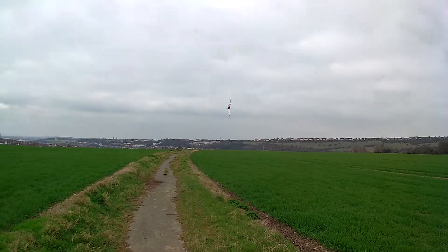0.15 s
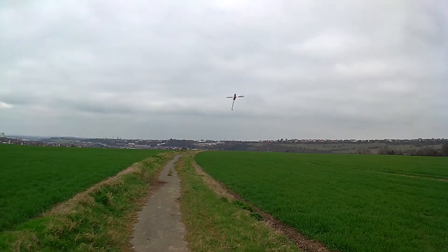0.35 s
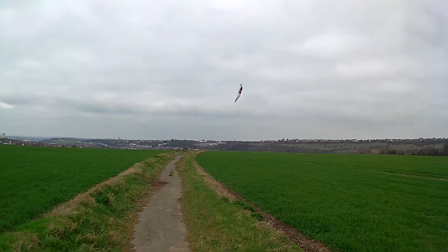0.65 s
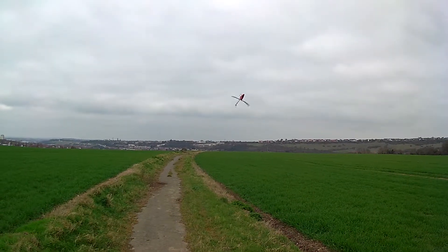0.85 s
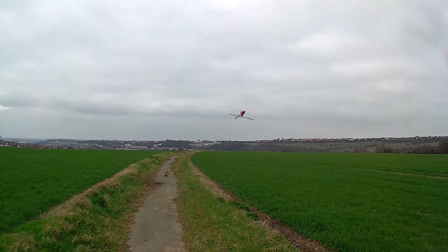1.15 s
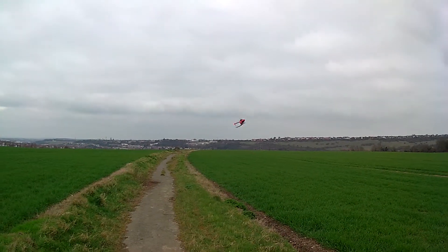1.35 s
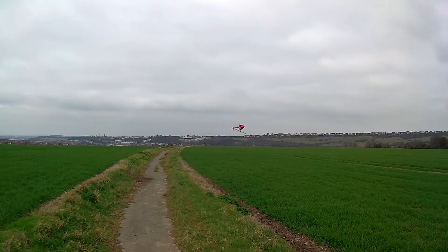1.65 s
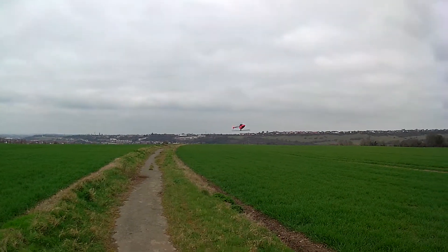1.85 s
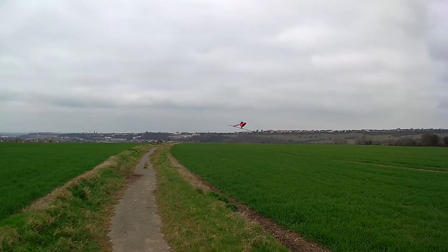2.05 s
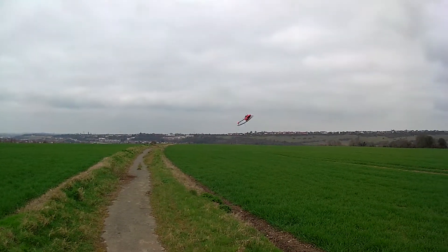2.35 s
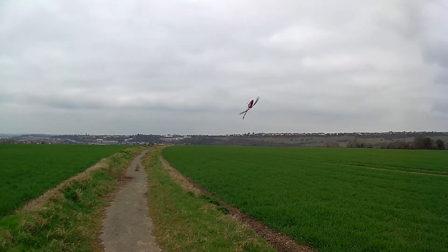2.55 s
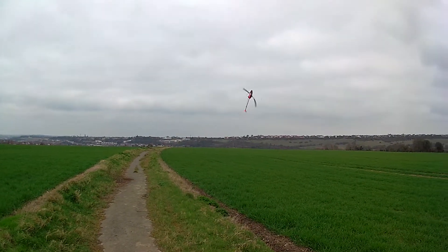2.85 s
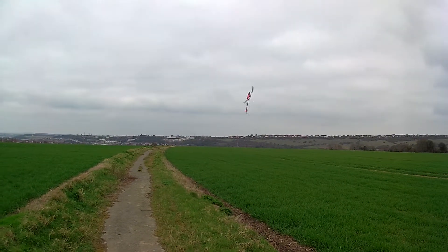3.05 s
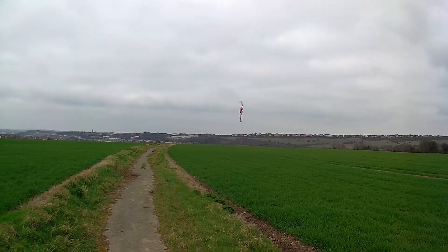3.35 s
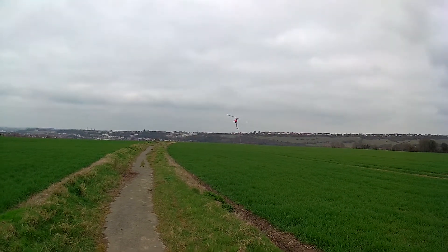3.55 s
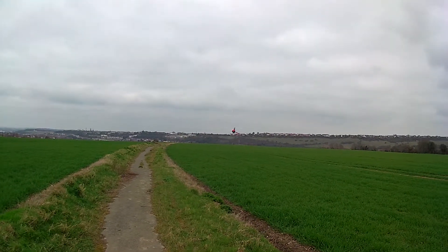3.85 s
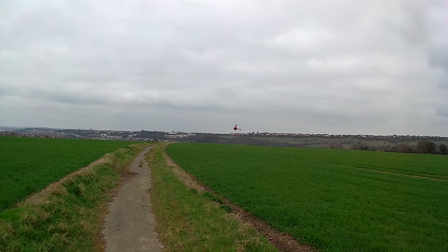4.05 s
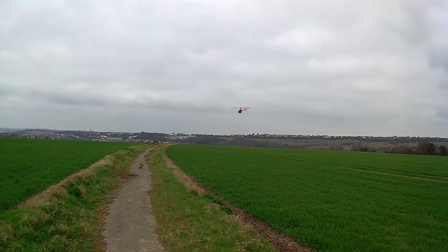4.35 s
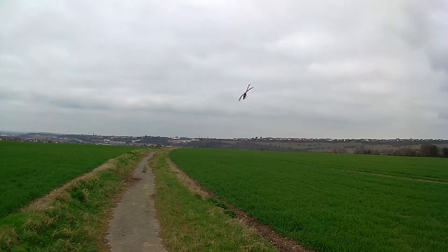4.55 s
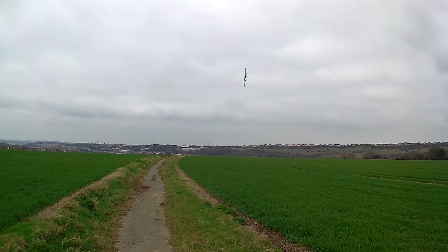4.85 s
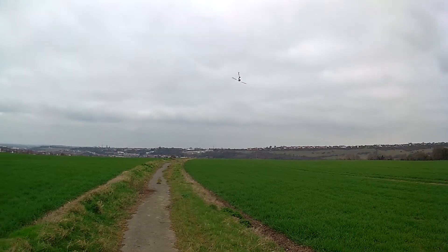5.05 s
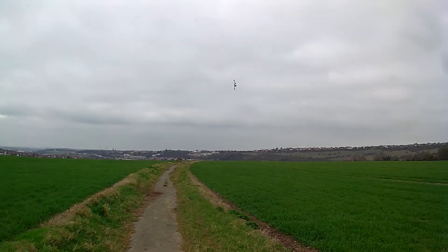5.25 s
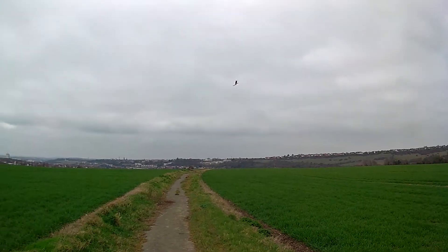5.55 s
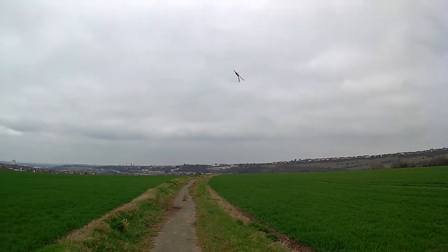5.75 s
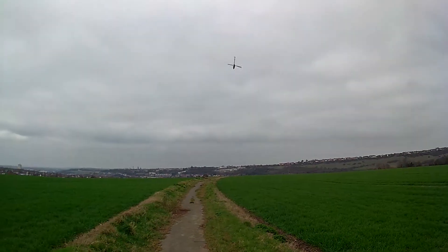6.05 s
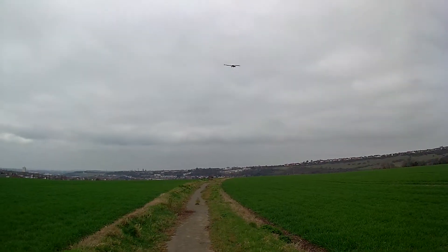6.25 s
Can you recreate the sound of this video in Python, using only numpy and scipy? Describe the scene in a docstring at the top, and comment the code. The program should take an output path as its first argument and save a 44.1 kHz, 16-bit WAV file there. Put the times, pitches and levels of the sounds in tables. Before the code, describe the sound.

Choppy wind thumps and pops on the microphone over the high, wavering whine and surging rotor whoosh of a model helicopter.

```python
"""Model helicopter in gusty wind

A small electric model helicopter flies aerobatics some way off over open fields. Its main gear whines
at the tooth-meshing rate, the pitch bending with load and motion, while the rotor blades modulate
air noise into a pulsing swish. Close up, the wind separates over the microphone port in abrupt,
rough gusts above a soft rumble."""
import sys
import numpy as np
from scipy import signal
from scipy.fft import rfft, irfft, next_fast_len
from scipy.io import wavfile
from scipy.ndimage import uniform_filter1d, map_coordinates

SR = 44100
rng = np.random.default_rng(int(sys.argv[2]) if len(sys.argv) > 2 else 0)


def wav_out(sig):
    """Save sig, one row per channel (or a flat mono array), as 16-bit PCM at SR to the path in sys.argv[1]."""
    wavfile.write(sys.argv[1], SR, np.round(np.clip(np.atleast_2d(sig).T, -1, 1) * 32767).astype(np.int16))


N = 281799
TIME = np.arange(N) / SR
MAIN_TEETH = 152
BEAM_TOP_DB = -42   # level of a gear tone beamed straight at the listener

# wind breaking over the port: start_s, crest_s, end_s, crest_db, nominal_pitch_hz
GUSTS = [(0.142, .17, .176, -29, 1100), (.207, .212, .223, -18.5, 904), (.283, .298, .348, -14, 861),
         (.378, .382, .398, -21, 1100), (.415, .425, .516, -16.5, 1020), (.55, .554, .647, -15, 800),
         (.702, .707, .716, -34, 950), (.833, .838, .881, -16.5, 830), (1.006, 1.02, 1.067, -17, 829),
         (1.14, 1.144, 1.149, -20, 930), (1.167, 1.17, 1.191, -19.5, 845),
         (1.206, 1.212, 1.253, -19.5, 931), (1.373, 1.378, 1.384, -25, 757.3),
         (1.42, 1.426, 1.433, -21, 709), (1.453, 1.54, 1.562, -17.5, 630), (2.009, 2.015, 2.025, -30, 570),
         (2.047, 2.115, 2.195, -12.5, 850), (2.215, 2.22, 2.229, -20.5, 700),
         (2.258, 2.268, 2.31, -15, 1020), (2.346, 2.375, 2.461, -18, 810),
         (2.526, 2.585, 2.648, -13.5, 760), (2.665, 2.672, 2.69, -14, 800), (2.69, 2.737, 2.752, -21, 620),
         (2.775, 2.8, 2.865, -19.5, 760), (2.882, 2.945, 3.076, -13.5, 709.7),
         (3.097, 3.102, 3.109, -13, 679.8), (3.135, 3.153, 3.171, -21.5, 781),
         (3.187, 3.193, 3.24, -17, 630), (3.399, 3.404, 3.414, -28, 650), (3.482, 3.535, 3.551, -19, 930),
         (3.64, 3.69, 3.765, -16, 720.2), (4.85, 4.865, 4.878, -18.5, 680), (5.02, 5.06, 5.095, -29, 750),
         (5.102, 5.115, 5.126, -25, 700), (5.137, 5.198, 5.231, -22.5, 600),
         (5.341, 5.35, 5.369, -22, 539.6), (5.461, 5.465, 5.49, -31.5, 570), (6.065, 6.08, 6.09, -33, 510),
         (6.092, 6.103, 6.117, -22.5, 469.7)]
# spectrum of the air driven by either rotor: frequency_hz, gain_db
WASH_SPECTRUM = [(150,-28),(450,2.5),(700,5),(1050,-0.5),(1500,-2),(2300,-1),(3400,-13),(6000,-22)]
# spectrum of the tip hiss and the high tooth clatter: frequency_hz, gain_db
HISS_SPECTRUM = [(3500,-15),(5000,-9),(6300,-6.5),(8200,-6.5),(8750,1),(9700,2),(10300,-1),(11100,-2),(11700,-12.5),(12600,-14.5),(15700,-27)]


def from_db(db):
    """Amplitude ratio of a level in decibels."""
    return 10 ** (np.asarray(db) / 20)


def unit_power(x):
    """Normalisation to a mean square of one."""
    return x / np.sqrt(np.mean(x ** 2) + 1e-20)


def in_time(rows):
    """Linear interpolation of each column against the times in the first."""
    times, *columns = np.transpose(rows)
    return [np.interp(TIME, times, column) for column in columns]


def coloured(x, spectrum):
    """Spectral shaping to unit power, with a roll-off of 12 dB per octave beyond the table."""
    hz, db = np.transpose(spectrum)
    size = next_fast_len(len(x))
    bin_hz = np.maximum(np.arange(size // 2 + 1) * SR / size, 1)
    roll_off = np.minimum(bin_hz / hz[0], 1) ** 2 * np.minimum(hz[-1] / bin_hz, 1) ** 2
    gain = from_db(np.interp(np.log(bin_hz), np.log(hz), db))
    return unit_power(irfft(rfft(x, size) * roll_off * gain, size)[:len(x)])


def drift(corner_hz):
    """Low-passed Gaussian noise: a slow random fluctuation of unit power."""
    hop = 40
    pole = np.exp(-2 * np.pi * corner_hz * hop / SR)
    noise = rng.standard_normal(N // hop + 2002)
    slow = signal.lfilter([1], [1, -2 * pole, pole ** 2], noise)[2000:]
    return np.interp(np.arange(N) / hop, np.arange(len(slow)), unit_power(slow))


def smooth(x, seconds):
    """Triangular smoothing: a moving average applied twice."""
    size = max(int(seconds * SR), 1)
    return uniform_filter1d(uniform_filter1d(x, size), size)


def tone(cycles, flutter_db, wander_rad):
    """Scintillation: moving air modulates the level and phase of a partial of unit power."""
    phase = 2 * np.pi * (cycles + rng.random()) + wander_rad * drift(14)
    return unit_power(np.sin(phase) * from_db(flutter_db * drift(19)))


def gust_envelope(start_db=-4.5, end_db=-6.5):
    """Intermittent flow: each gust starts abruptly, builds to its crest, eases and stops."""
    envelope = np.zeros(N)
    for start, crest, end, crest_db, _ in GUSTS:
        blowing = (TIME >= start) & (TIME < end)
        shape_db = np.interp(TIME[blowing], [start, crest, end], [start_db, 0, end_db])
        envelope[blowing] = from_db(crest_db + shape_db)
    return envelope


def wind_rumble(envelope):
    """Turbulent pressure: slow eddies press on the microphone, harder around each gust."""
    # rumble of the steady breeze: time_s, level_db
    breeze = [(0, -49), (.8, -43), (1.7, -48), (2.3, -42), (3.3, -43), (4.1, -53), (4.35, -49), (4.47, -39),
              (4.56, -44), (4.78, -37), (5.05, -40), (5.3, -35), (5.55, -52), (6.39, -51)]
    # spectrum of the slow eddies: frequency_hz, gain_db
    spectrum = [(20,-12),(45,-4.5),(75,1.5),(170,-2.5),(300,-6),(500,-14.5),(1000,-25.5),(3000,-58)]
    breeze_db, = in_time(breeze)
    level = from_db(breeze_db) + from_db(-21) * smooth(envelope, seconds=.08)
    rumble = coloured(rng.standard_normal(N), spectrum)
    return level * unit_power(rumble * from_db(2.6 * drift(18)))


def gust_roar(envelope, reference_hz=790.2):
    """Flow separation at the port: it sets in at once, and faster air sweeps eddies by at higher pitch."""
    # spectrum of the eddies at the reference pitch: frequency_hz, gain_db
    spectrum = [(25,-34),(60,-25),(120,-15.5),(250,-7.5),(400,-1.5),(600,-0.5),(1000,-9),(1500,-16),(2000,-23.5),(3000,-40),(4500,-47.5),(9000,-46.5)]
    pitch_hz, = in_time([(crest, hz) for _, crest, _, _, hz in GUSTS])
    eddies = coloured(rng.standard_normal(2 * N), spectrum)
    lumps = drift(129.65)   # a strong lump of air is both louder and quicker
    speed = pitch_hz / reference_hz * np.exp(.12 * lumps)
    roar = map_coordinates(eddies, [np.cumsum(speed)], order=3, mode="mirror") * from_db(5 * lumps)
    roar /= np.sqrt(smooth(roar ** 2, seconds=.014) + 1e-9)   # lumps share out the gust's power
    stir = from_db(-17 + 3 * drift(40)) * smooth(envelope, seconds=.025)   # weaker air around each gust
    return roar * np.hypot(smooth(envelope, seconds=.00056), stir)


def eddy(time_s, pitch_hz):
    """Pressure transient of one eddy: a sharp, slightly lopsided spike between two troughs."""
    near = slice(*np.searchsorted(TIME, [time_s - .005, time_s + .005]))
    angle = 2 * np.pi * pitch_hz * (TIME[near] - time_s)
    window = np.exp(.25 - np.hypot(angle, .35) / 1.8)
    pressure = np.zeros(N)
    pressure[near] = window * np.cos(1.05 * angle + rng.normal(0, .45))
    return pressure


def eddy_pops(envelope, lesser_per_s=7, lesser_hz=1050, wake_db=-9):
    """Eddy impacts on the port, each with a weaker, inverted wake; lesser ones fall at random in gusts."""
    # single hard eddies: time_s, level_db, pitch_hz
    hard_eddies = [(.3086, -4, 990), (.4247, -0.5, 1060), (.55, -2, 930), (.6356, -6, 942),
                   (.645, -8, 1018), (1.0058, -5, 1027), (1.6002, -3, 742), (2.048, -7, 990),
                   (2.2946, -5, 1538), (2.3732, -6.5, 860), (2.5071, -8, 806), (2.5875, 0, 742),
                   (2.6358, -1, 760), (3.1382, -7, 1031), (3.5312, 2.5, 1097), (4.8529, -3.5, 841.8),
                   (4.859, -3.5, 946), (4.9395, -10, 698), (4.9973, -7, 1098), (5.0197, -11, 888),
                   (5.0286, -10, 846), (5.036, -8, 650), (5.0602, -4.5, 760), (5.0636, -7, 990),
                   (5.0727, -6, 684)]
    births = np.flatnonzero((rng.random(N) < lesser_per_s / SR) & (envelope > 0))
    lesser = [(i / SR, 20 * np.log10(envelope[i]) + rng.normal(7, 1.5), lesser_hz) for i in births]
    hits = list(hard_eddies) + lesser
    wake_lags_s = rng.uniform(.0014, .003, len(hits))
    return sum(from_db(db) * (eddy(time_s, hz) - from_db(wake_db) * eddy(time_s + lag_s, hz))
               for (time_s, db, hz), lag_s in zip(hits, wake_lags_s))


def tail_rotor(teeth, tooth_db, turns_per_tooth=.0303, gear_ratio=.5488):
    """Fixed gearing: the tones of the tail rotor and its gear follow the speed of the main shaft."""
    # buzz of the tail rotor: multiple_of_tooth_rate, level_db
    buzz_tones = [(.0608, -54), (.1212, -65), (.1822, -66), (.243, -68), (.2742, -68)]
    # tail gear tone, loudest when the tail faces the listener: time_s, level_db
    gear_levels = [(0, -63), (1.8, -63), (2.3, -57), (3.5, -60), (4.2, -57), (4.42, -64), (4.55, -55),
                   (4.68, -64), (4.77, -51), (4.9, -65), (6.39, -64)]
    # growl of the tail rotor under load: time_s, level_db
    load_levels = [(0, -63), (5.4, -62.5), (5.65, -56), (5.8, -50), (6.05, -52), (6.39, -59)]
    # harmonics of the growl: multiple_of_turning_rate, relative_db
    harmonics = [(3,-6.5),(4,-2.5),(5,-9),(6,-11.5),(7,-9),(8,-11)]
    gear_db, = in_time(gear_levels)
    load_db, = in_time(load_levels)
    buzz = sum(from_db(db) * tone(k * teeth, flutter_db=.6, wander_rad=.35) for k, db in buzz_tones)
    buzz *= from_db(.5 * (smooth(tooth_db, seconds=.33) - BEAM_TOP_DB))   # swells with the whine
    turns = turns_per_tooth * teeth
    growl = sum(from_db(db) * tone(k * turns, flutter_db=6.5, wander_rad=1.53) for k, db in harmonics)
    gear = tone(gear_ratio * teeth, flutter_db=2.5, wander_rad=.3)
    wash = from_db(-4) * coloured(rng.standard_normal(N), WASH_SPECTRUM)
    return buzz + from_db(load_db) * (growl + wash) + from_db(gear_db) * gear


def ground_reflection(direct, reflectance=.098, microphone_height_m=1.6, sound_m_per_s=343):
    """Comb filtering: the field adds a weaker copy, later the higher the helicopter flies."""
    # angle of the helicopter above the horizon: time_s, elevation_deg
    elevation = [(0,5.1),(.5,6),(1,5.63),(2,1.53),(2.9,6.9),(3.85,0.88),(4.75,8.9),(5.5,10.8),(6.39,16.6)]
    elevation_deg, = in_time(elevation)
    lag_s = 2 * microphone_height_m * np.sin(np.radians(elevation_deg)) / sound_m_per_s
    return direct + reflectance * map_coordinates(direct, [(TIME - lag_s) * SR], order=3)


def blade_noise(spectrum, turns, depth):
    """Amplitude modulation by blade passage: noise surges twice a turn, one blade a little stronger."""
    angle = 2 * np.pi * turns
    sweep = np.cos(2 * angle) + .2 * np.cos(4 * angle) + .22 * np.cos(angle)
    chop = from_db(7 * depth * sweep)
    chop /= np.sqrt(smooth(chop ** 2, seconds=.055))
    return coloured(rng.standard_normal(N), spectrum) * chop


def main_rotor(teeth, level_flight_db=-45, wash_lead_turns=.068):
    """Aerodynamic noise surges as each blade swings towards the listener; load deepens the chop."""
    # swish of the blades, tearing the air harder in each manoeuvre: time_s, level_db
    swish_levels = [(0, -57), (.16, -35), (.5, -38), (.68, -45), (1.3, -47), (1.85, -50), (2.45, -49),
                    (2.58, -38), (2.85, -44), (3.16, -50), (3.24, -36), (3.42, -42.5), (3.6, -35.5),
                    (3.83, -51), (4.55, -50), (5.13, -59), (5.32, -43), (5.47, -57), (5.74, -47.5),
                    (6.39, -51)]
    # hiss of the blade tips, beamed as the disc tilts: time_s, level_db
    hiss_levels = [(0, -42.5), (.18, -39.5), (.65, -47), (1.08, -40), (1.18, -46), (1.32, -39.5),
                   (1.95, -42.5), (2.2, -39.5), (2.38, -44), (2.7, -38), (3.05, -43.5), (3.3, -39.5),
                   (3.44, -44), (3.6, -36.5), (3.75, -45.5), (4.28, -52), (4.52, -38.5), (4.8, -42.5),
                   (5.12, -47), (5.35, -43.5), (5.47, -49), (6.39, -48)]
    # spectrum of the swish: frequency_hz, gain_db
    swish_spectrum = [(700,-17),(1200,-2.5),(1700,5.5),(2400,3.5),(3600,0),(4600,-1.5),(5600,-3),(7000,-1),(9000,0),(11000,-11),(13000,-28),(16000,-25)]
    swish_db, = in_time(swish_levels)
    hiss_db, = in_time(hiss_levels)
    load_db = swish_db - level_flight_db
    wash_db = -52 + 1.1 * load_db
    depth = np.clip(.52 + .028 * load_db, 0, 1)
    turns = teeth / MAIN_TEETH + .16
    swish = from_db(swish_db) * blade_noise(swish_spectrum, turns, depth)
    hiss = from_db(hiss_db) * blade_noise(HISS_SPECTRUM, turns, .47 * depth)
    wash = from_db(wash_db) * blade_noise(WASH_SPECTRUM, turns + wash_lead_turns, .62 * depth)
    scintillation = from_db(1.2 * drift(7.3))   # moving air makes the treble come and go
    return ground_reflection(swish + wash) + scintillation * hiss


def gear_rasp(teeth, level_db, spectrum):
    """Transmission error: no two teeth are alike, so their clatter repeats with each turn of the gear."""
    wheel = rng.standard_normal(1024)
    place = teeth / MAIN_TEETH % 1 * len(wheel)
    clatter = map_coordinates(wheel, [place], order=3, mode="grid-wrap")
    return from_db(level_db) * coloured(clatter, spectrum)


def mesh_tone(cycles, turns, level_db, sidebands):
    """Directivity: the tone wavers more off its beam, while its sidebands spread wider and fade less."""
    side_db = BEAM_TOP_DB + .83 * (smooth(level_db, seconds=.074) - BEAM_TOP_DB)
    sides = sum(from_db(db) * tone(cycles + k * turns, flutter_db=3.5, wander_rad=.6)
                for k, db in sidebands)
    off_beam = np.clip(1 - from_db(level_db - BEAM_TOP_DB), 0, 1)
    carrier = tone(cycles, flutter_db=1.1, wander_rad=.2 + .5 * off_beam)
    carrier_db = level_db + 2.5 * off_beam * drift(8)
    return from_db(carrier_db) * carrier + from_db(side_db) * sides


def main_gear(teeth, tooth_db, octave_db):
    """Gear meshing radiates the tooth rate and its octave, with sidebands set by the turning wheels."""
    # sidebands of the tooth tone: offset_cycles_per_turn, relative_db
    tooth_bands = [(-10.13, -10), (-8, -17), (-4, -20), (-2, -13.5), (-1, -13), (1, -16), (4, -16),
                   (8, -14.5), (10.13, -13.5), (16, -16), (20.26, -18), (31.8, -19)]
    # sidebands of its octave: offset_cycles_per_turn, relative_db
    octave_bands = [(-31.8, -13), (-16, -14), (-10.13, -13), (-8, -9), (6, -17), (8, -10), (10.13, -16),
                    (16, -17)]
    # spectrum of the lower tooth clatter: frequency_hz, gain_db
    rasp_spectrum = [(3000,-13),(4400,-8.5),(5300,-4.5),(6200,-2),(7500,-6.5),(9000,-12),(12000,-25)]
    turns = teeth / MAIN_TEETH
    whine = mesh_tone(teeth, turns, tooth_db, tooth_bands)
    octave = mesh_tone(2 * teeth, turns, octave_db, octave_bands)
    low_rasp = gear_rasp(teeth, tooth_db - 4.2, rasp_spectrum)
    high_rasp = gear_rasp(teeth, octave_db - .7, HISS_SPECTRUM)
    scintillation = from_db(1.1 * drift(7))
    return (whine + octave + low_rasp + high_rasp) * scintillation


def scene():
    """Superposition of the distant helicopter, driven by one shaft speed, and wind at the microphone."""
    # meshing rate of the main gear, bent by load and motion: time_s, pitch_hz
    tooth_rate = [(0, 5459), (.3, 5510), (.78, 5667), (1.2, 5564), (1.7, 5546), (2.1, 5550), (2.46, 5415),
                  (2.68, 5500), (2.95, 5445), (3.25, 5493), (3.85, 5494), (4.15, 5464), (4.33, 5468),
                  (4.66, 5318), (4.85, 5340), (5.18, 5474), (5.5, 5243), (5.64, 5331), (5.9, 5410),
                  (6.39, 5490)]
    # whine swelling and fading as the helicopter turns: time_s, tooth_db, octave_db
    whine_levels = [(0, -56, -53), (.3, -52, -52), (.77, -49, -52.5), (1.12, -49, -53), (1.34, -43.5, -44),
                    (1.76, -44, -40.5), (1.95, -46.5, -46), (2.2, -44, -41.5), (2.42, -46.5, -49),
                    (2.8, -51.5, -51), (2.96, -48.5, -43.5), (3.38, -54, -55), (3.62, -43.5, -41),
                    (3.72, -49.5, -48), (3.82, -43.5, -40.5), (4.3, -44, -42), (4.46, -51, -48),
                    (4.54, -45, -49), (4.95, -49, -49), (5.14, -55, -55), (5.3, -51, -53), (5.56, -56, -58),
                    (5.64, -47.5, -54), (5.73, -55, -53), (5.87, -52, -53.5), (6.39, -61, -56)]
    tooth_hz, = in_time(tooth_rate)
    tooth_db, octave_db = in_time(whine_levels)
    teeth = np.cumsum(tooth_hz) / SR   # running count of meshed teeth
    helicopter = main_gear(teeth, tooth_db, octave_db) + tail_rotor(teeth, tooth_db) + main_rotor(teeth)
    envelope = gust_envelope()
    wind = gust_roar(envelope) + wind_rumble(envelope) + eddy_pops(envelope)
    return (helicopter + wind)[None]


def record(dry):
    """Soft saturation rounds the strongest peaks, and a steep low-pass filter cuts the top."""
    cutoff_hz = 15700
    low_pass = signal.ellip(12, .1, 80, cutoff_hz, fs=SR, output="sos")
    return signal.sosfilt(low_pass, np.tanh(dry))


dry = scene()
out = record(dry)
wav_out(out)
```